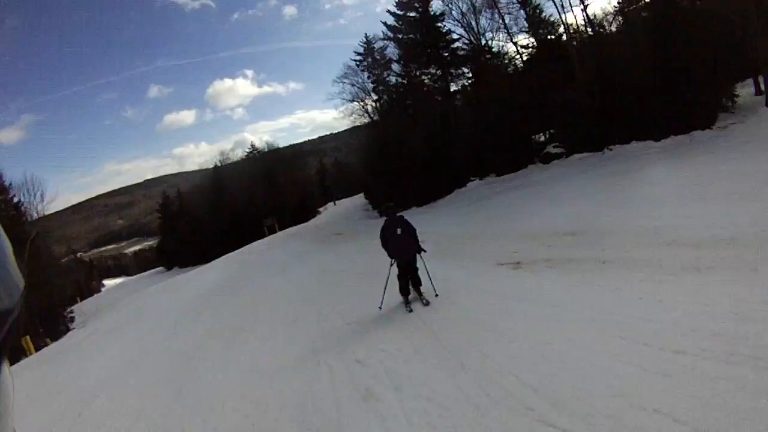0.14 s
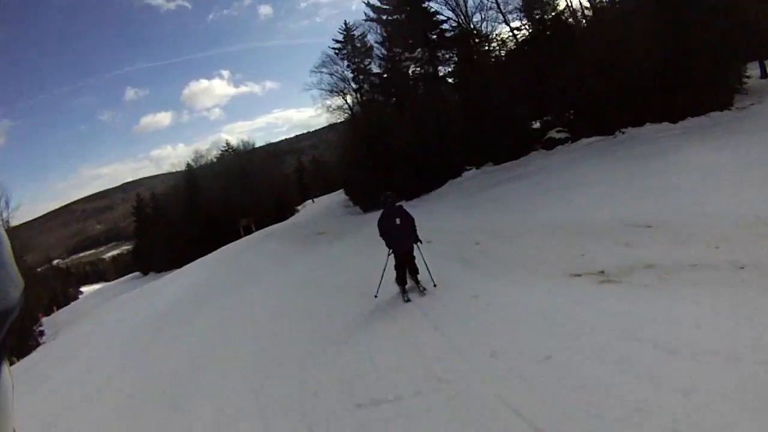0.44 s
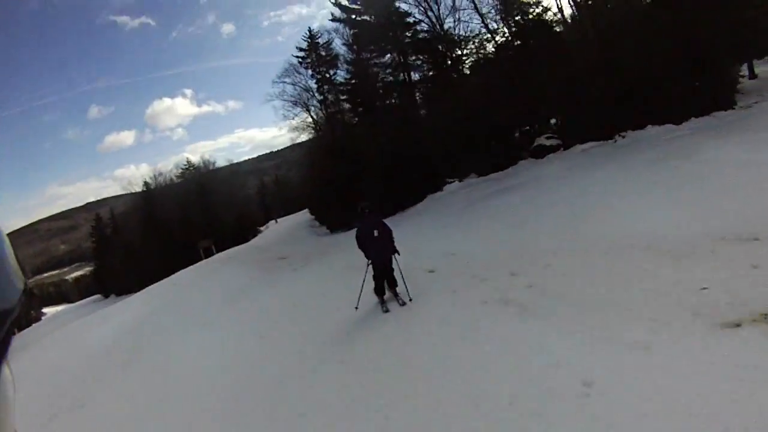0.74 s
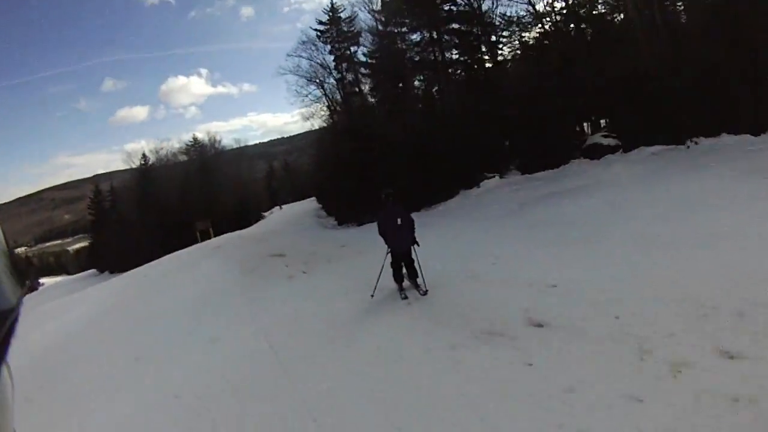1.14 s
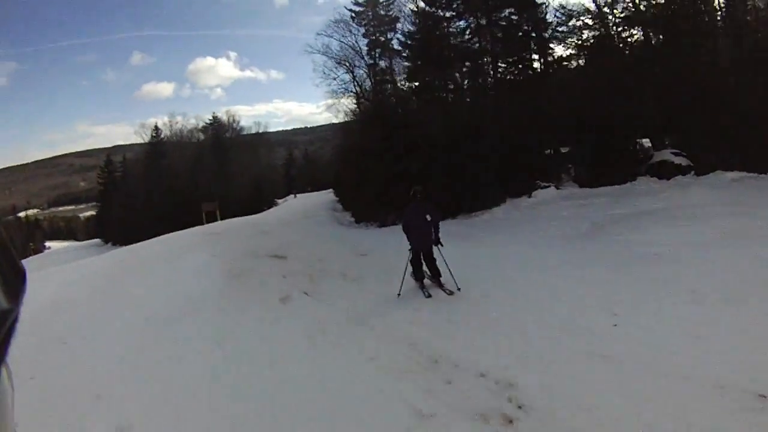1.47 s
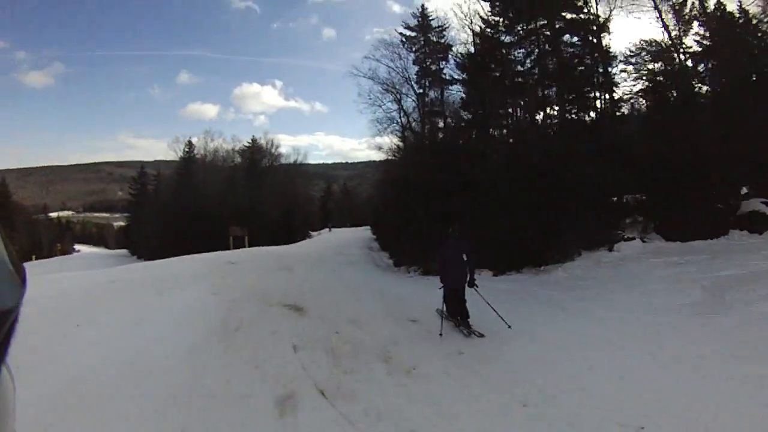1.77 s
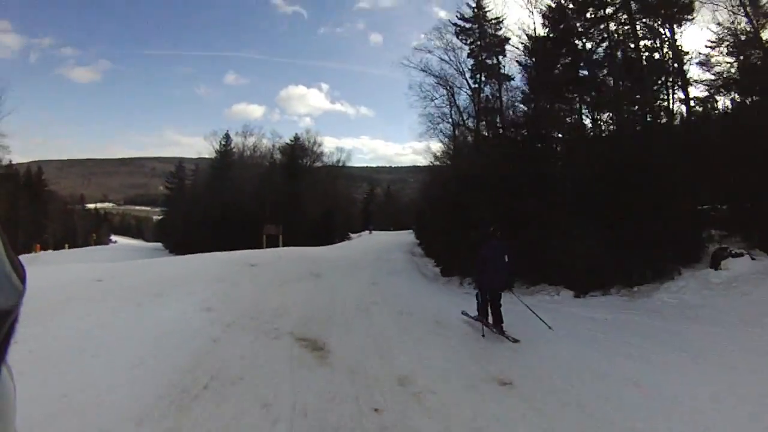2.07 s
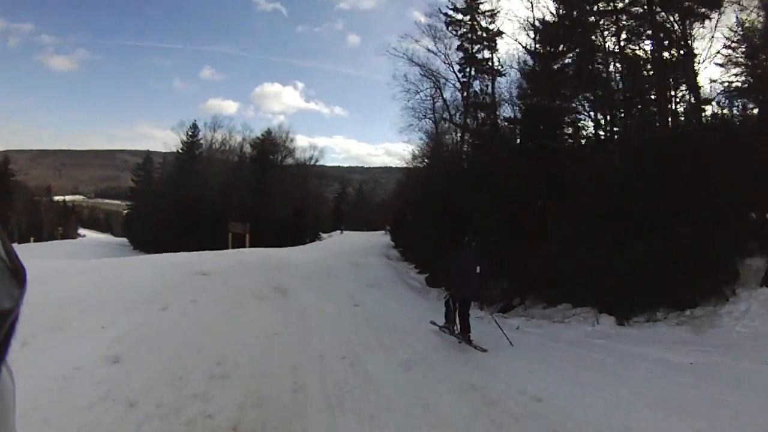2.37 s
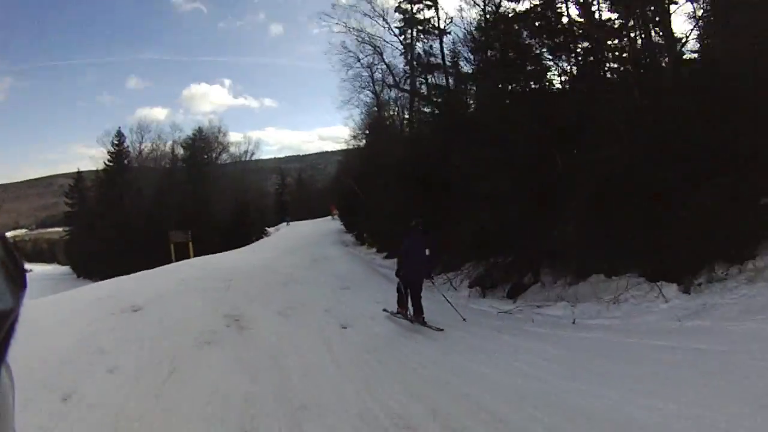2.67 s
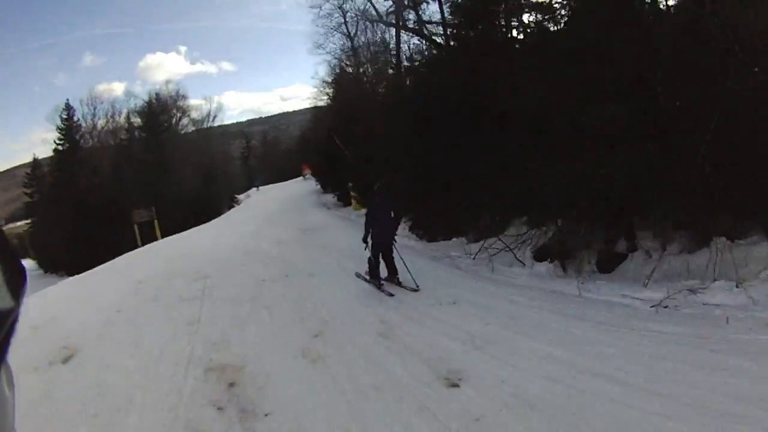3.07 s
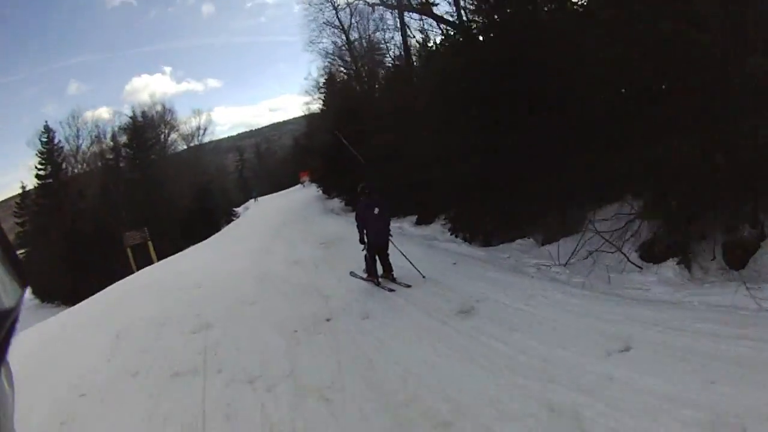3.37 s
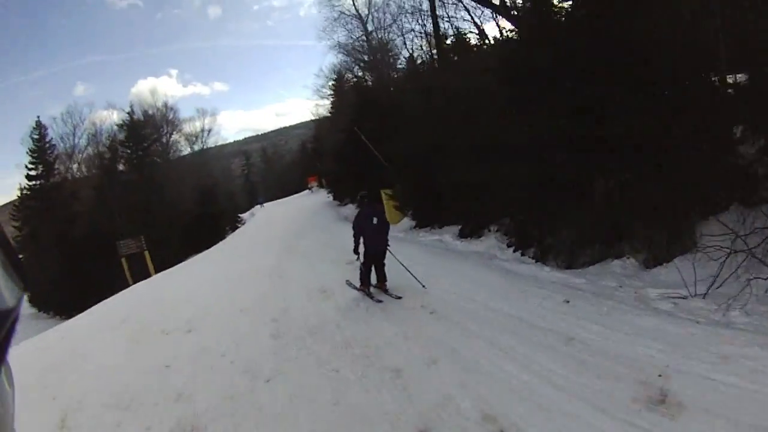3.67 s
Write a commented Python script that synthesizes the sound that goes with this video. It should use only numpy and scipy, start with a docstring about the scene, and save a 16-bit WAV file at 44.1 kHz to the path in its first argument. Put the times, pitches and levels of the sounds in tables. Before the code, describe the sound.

Lumpy wind noise with sharp pops covers skis scraping on snow, with a few brief knocks.

```python
"""A helmet camera glides down a snowy slope: lumpy, gusty wind opens over skis that hiss and crunch on snow.
Short housing knocks join in before half a second and longer ski crunches near one second; gusts pin the
capsule for milliseconds and the sound all but vanishes. The buffeting surges again after 2.6 s.
Wind is shaped noise with pressure pops, skis are shaped noise with sparse grains, and knocks and longer
crunches are noise bursts ringing the housing. One microphone feeds both channels."""
import sys
import numpy as np
from scipy import signal
from scipy.fft import rfft, irfft, next_fast_len
from scipy.io import wavfile
from scipy.ndimage import uniform_filter1d, map_coordinates

SR = 44100
rng = np.random.default_rng(int(sys.argv[2]) if len(sys.argv) > 2 else 0)


def master_out(mix):
    """Clip the mix to full scale and print it as 16-bit PCM to the path in sys.argv[1]."""
    frames = np.transpose(np.atleast_2d(mix))
    ceiling = np.clip(frames, -1, 1)
    pcm = np.round(ceiling * 32767).astype(np.int16)
    wavfile.write(sys.argv[1], SR, pcm)


N = 168021


def amp(db):
    """Decibels to linear gain."""
    return 10 ** (np.asarray(db) / 20)


def unit(x):
    """Scale to rms 1."""
    return x / np.sqrt(np.mean(x ** 2) + 1e-20)


def curves(rows):
    """One straight-line envelope, sample by sample, for each column after the time."""
    times, *columns = np.transpose(rows)
    return [np.interp(np.arange(N) / SR, times, column) for column in columns]


def wobble(rate):
    """A smooth random curve through `rate` random knots a second."""
    knots = rng.standard_normal(N // 50)
    return map_coordinates(knots, [np.arange(N) * rate / SR])


def filtered(x, response):
    """Multiply the spectrum by a response of frequency, zero-padded against wrap-around."""
    size = next_fast_len(N + SR // 2)
    spectrum = rfft(x, size) * response(np.fft.rfftfreq(size, 1 / SR))
    return irfft(spectrum, size)[..., :N]


def coloured(x, points):
    """Equalise with (Hz, dB) points joined on a log frequency axis."""
    f, db = np.transpose(points)
    return filtered(x, lambda hz: amp(np.interp(np.log(hz + 1), np.log(f + 1), db)))


def patchy(depth_db):
    """White noise whose gain varies in random patches of time and frequency."""
    spectrum = signal.stft(rng.standard_normal(N), nperseg=512)[2]
    field = uniform_filter1d(rng.standard_normal(spectrum.shape), size=6, axis=0)  # across frequency
    field = uniform_filter1d(field, size=8, axis=1)  # across time
    noise = signal.istft(spectrum * amp(depth_db * unit(field)), nperseg=512)[1]
    return unit(noise[:N])


LOW_CUT_HZ = 93.4


def low_cut(hz):
    """Second-order high-pass of the input stage."""
    s = 1j * hz / LOW_CUT_HZ
    return s * s / (s * s + np.sqrt(2) * s + 1)


def in_band(x, lo, hi):
    """Scale so that rms 1 is left between lo and hi Hz after the low cut."""
    heard = filtered(x, lambda hz: low_cut(hz) * (hz > lo) * (hz < hi))
    return x / np.std(heard)


# Gust envelope. Each row: time in seconds, buffeting level in dB, rush level in dB.
WIND_LEVELS = [(0.0, -36, -35.5), (0.07, -33, -35.5), (0.09, -28, -27), (0.14, -34.5, -37.5),
               (0.17, -26, -29.5), (0.19, -40, -42.5), (0.24, -34.5, -36.5), (0.29, -23.5, -29),
               (0.35, -23, -31), (0.42, -26.5, -35), (0.5, -27, -38), (0.58, -30.5, -41),
               (0.64, -33.5, -41.5), (0.69, -26, -37.5), (0.71, -33, -37.5), (0.73, -29.5, -27.5),
               (0.74, -31, -43.5), (0.78, -29.5, -33), (0.82, -25, -40), (0.84, -23.5, -34.5),
               (0.95, -33.5, -38), (1.0, -30.5, -36), (1.11, -36.5, -43.5), (1.15, -35.5, -55),
               (1.18, -31, -40), (1.36, -29, -37), (1.43, -36.5, -47.5), (1.47, -28.5, -38),
               (1.54, -37.5, -46), (1.6, -36.5, -43.5), (1.655, -45.5, -45), (1.68, -39, -48),
               (1.71, -45, -43), (1.75, -45.5, -44.5), (1.79, -29.5, -37.5), (1.84, -41.5, -38),
               (1.87, -44, -43.5), (1.91, -31, -36.5), (1.92, -56, -45), (1.94, -42, -46.5),
               (2.0, -33, -40), (2.29, -35, -43), (2.37, -46, -40), (2.49, -41.5, -46), (2.6, -31.5, -41.5),
               (2.62, -16.5, -31), (2.66, -30, -41), (2.67, -20, -32.5), (2.68, -34, -44.5),
               (2.75, -26, -37.5), (2.77, -39, -50.5), (2.79, -25.5, -37), (2.81, -33.5, -44),
               (2.85, -31.5, -45), (2.88, -33.5, -50), (2.89, -37.5, -50), (2.97, -32, -46),
               (3.01, -36, -41.5), (3.05, -27.5, -42), (3.08, -32, -46), (3.12, -30, -44),
               (3.14, -23.5, -40), (3.16, -30, -44), (3.26, -32.5, -37.5), (3.3, -29, -39),
               (3.36, -26.5, -40), (3.42, -28.5, -33), (3.48, -22, -35.5), (3.53, -23.5, -35.5),
               (3.55, -22, -38.5), (3.58, -33.5, -35), (3.61, -21.5, -39), (3.63, -28, -33.5),
               (3.7, -39.5, -39), (3.76, -26, -37), (3.81, -27.5, -40)]
# Slower wind envelope. Each row: time in seconds, rumble level in dB, level of the rush's upper edge in dB.
SLOW_LEVELS = [(0.0, -42, -51), (0.27, -42.5, -53), (0.4, -43, -53), (0.58, -52, -71), (0.88, -43.5, -49.5),
               (1.0, -42, -57.5), (1.3, -46, -54), (1.43, -51, -66), (1.51, -52, -59), (1.68, -52, -66),
               (1.88, -44.5, -54), (2.08, -42.5, -65.5), (2.46, -53, -65), (2.75, -41, -64),
               (3.08, -49, -79), (3.3, -44.5, -70), (3.59, -53, -57.5), (3.81, -34.5, -57.5)]
# Tone of the deep rumble. Each row: frequency in Hz, relative density in dB per Hz.
RUMBLE_TONE = [(15, -18), (30, 10), (60, 1.5), (100, -7), (160, -7), (300, -66)]
# Tone of the turbulent lumps. Each row: frequency in Hz, relative density in dB per Hz.
BUFFET_TONE = [(30, -37), (70, -1), (110, 0), (170, 2), (245, 4.5), (400, 0.5), (700, -10), (1500, -46),
               (3000, -94)]
# Tone of the rush above them. Each row: frequency in Hz, relative density in dB per Hz.
RUSH_TONE = [(100, -13), (300, -11.5), (600, 1.5), (1000, 0), (1500, -4), (1900, -13), (2300, -23),
             (3500, -29), (8000, -63)]
# Tone of the rush's upper edge. Each row: frequency in Hz, relative density in dB per Hz.
EDGE_TONE = [(1200, -8), (1800, 9.5), (2200, 2), (2800, -7), (4000, -15), (8000, -60)]
# The small pops' sizes spread evenly over this many dB; the share is of the power.
SMALL_POPS_PER_S, SMALL_POP_SPREAD_DB, SMALL_POP_SHARE = 400, 8, .12


def wind(buffet_swing_db, rush_swing_db):
    """Deep rumble, lumps of turbulence and rush, with small one-sided pops through all but the rumble."""
    buffet_db, rush_db = curves(WIND_LEVELS)
    rumble_db, edge_db = curves(SLOW_LEVELS)
    draw = rng.random((2, N))
    hits = draw[0] < SMALL_POPS_PER_S / SR
    small_pops = unit(hits * amp(SMALL_POP_SPREAD_DB * draw[1]))

    def eddy():
        """Fresh turbulent noise carrying the same small pops each time."""
        return np.sqrt(1 - SMALL_POP_SHARE) * patchy(depth_db=1) + np.sqrt(SMALL_POP_SHARE) * small_pops

    rumble = in_band(coloured(patchy(depth_db=1.5), RUMBLE_TONE), 25, 90)
    buffet = in_band(amp(buffet_swing_db) * coloured(eddy(), BUFFET_TONE), 100, 500)
    rush = in_band(amp(rush_swing_db) * coloured(eddy(), RUSH_TONE), 600, 1800)
    edge = in_band(amp(rush_swing_db) * coloured(eddy(), EDGE_TONE), 1900, 2700)
    low = amp(rumble_db) * rumble + amp(buffet_db) * buffet
    return low + amp(rush_db) * rush + amp(edge_db) * edge


# The sharpest pressure pops of wind on the port. Each row: time in seconds, peak in dB before the low cut.
POP_HITS = [(.0884, -15), (.0988, -15), (.1249, -19), (.1574, -18), (.1659, -15), (.2834, -16),
            (.7273, -18), (.741, -18), (.7552, -18), (.7923, -16), (1.3728, -20), (1.4807, -20),
            (1.5233, -24), (2.0707, -19), (2.5676, -22), (2.6151, -13), (2.6749, -16), (2.7143, -19),
            (2.7979, -19), (3.0661, -21), (3.0882, -22), (3.3304, -20), (3.5071, -14), (3.5493, -13),
            (3.6412, -21)]
POP_WIDTH_S = .00027  # standard deviation of the bell


def pops():
    """Each pop is one brief bell-shaped push of pressure."""
    t = np.arange(N) / SR
    return sum(amp(db) * np.exp(-.5 * ((t - s) / POP_WIDTH_S) ** 2) for s, db in POP_HITS)


# Ski envelope. Each row: time in seconds, scrape level in dB.
SKI_LEVELS = [(0, -56), (.08, -53.5), (.25, -55), (.30, -50.5), (.53, -58), (.70, -53), (.85, -56),
              (.95, -63), (1.01, -59.5), (1.10, -61.5), (1.30, -61), (1.44, -62.5), (1.53, -61),
              (1.58, -60), (1.61, -56.5), (1.64, -61), (1.658, -58), (1.685, -66), (1.705, -55.5),
              (1.735, -56.5), (1.77, -52), (1.90, -53), (2.0, -50), (2.19, -52.5), (2.32, -52), (2.48, -52),
              (2.53, -56.5), (2.60, -52.5), (2.70, -56.5), (2.79, -65.5), (2.84, -58), (2.96, -59.5),
              (3.05, -58.5), (3.18, -52.5), (3.27, -52.5), (3.5, -53.5), (3.66, -52.5), (3.81, -53)]
# Tone of the scrape through the housing. Each row: frequency in Hz, relative density in dB per Hz.
SCRAPE_TONE = [(800, -3.5), (2000, -48), (2500, -4.5), (3200, 0), (3700, 3), (3950, -2.5), (4560, 1),
               (5700, -2.5), (6250, -6.5), (6900, -1), (8000, -5.5), (8700, -11.5), (11300, -13),
               (12200, -21), (15400, -19.5)]
# Uneven snow under the skis. Each row: changes per second, swing in dB.
CRUNCH_SWINGS = [(25, -1), (60, 1), (200, 0.5)]
# Grain sizes reach above the smallest by this many dB on average; the share is of the power.
GRAINS_PER_S, GRAIN_SPREAD_DB, GRAIN_SHARE = 2500, 1.8, 0.25


def skis(swing_db):
    """Hiss plus single snow grains breaking, pulsing with the uneven surface."""
    level_db, = curves(SKI_LEVELS)
    draw = rng.random((3, N))
    hits = draw[0] < GRAINS_PER_S / SR
    polarity = np.sign(draw[1] - .5)
    grains = hits * polarity * amp(-GRAIN_SPREAD_DB * np.log(draw[2] + 1e-9))
    raw = np.sqrt(1 - GRAIN_SHARE) * patchy(depth_db=1.5) + np.sqrt(GRAIN_SHARE) * unit(grains)
    uneven_db = swing_db + sum(db * wobble(rate) for rate, db in CRUNCH_SWINGS)
    scrape = coloured(amp(uneven_db) * raw, SCRAPE_TONE)
    return amp(level_db) * in_band(scrape, 2800, 9000)


# Short knocks on the housing and longer crunches of the skis heard through it. Each row: start in seconds,
# burst length in seconds, then the peak in dB before the low cut for each resonance from low to high.
HOUSING_HITS = [(.3735, .002, -30, -43, -52, -51, -54, -51), (.7258, .0025, -21, -48, -34, -39, -38, -54),
                (.940, .004, -48, -56, -50, -56, -62, -72), (.970, .018, -45, -55, -52, -56, -55, -64),
                (1.019, .012, -40, -49, -44, -51, -57, -68), (1.520, .004, -33, -45, -58, -62, -64, -74),
                (1.596, .012, -39, -51, -50, -53, -56, -70), (2.0690, .0025, -28, -42, -38, -46, -38, -50),
                (2.285, .015, -46, -52, -46, -49, -53, -64), (2.548, .004, -44, -54, -49, -56, -60, -70),
                (2.6047, .003, -38, -45, -35, -48, -43, -60), (2.6095, .003, -36, -48, -41, -44, -52, -60),
                (2.7132, .0018, -34, -40, -48, -58, -47, -47), (2.7345, .003, -40, -39, -58, -62, -64, -72),
                (2.755, .004, -42, -51, -58, -64, -66, -74), (2.832, .008, -46, -56, -52, -54, -58, -70),
                (3.128, .012, -45, -55, -49, -52, -54, -64), (3.180, .003, -40, -46, -46, -51, -55, -64),
                (3.188, .008, -42, -52, -48, -50, -51, -61)]
# Resonances of the housing. Each row: centre in Hz, width in Hz.
CASE_MODES = [(1250, 900), (2500, 900), (3750, 900), (5300, 1300), (7300, 1700), (11000, 5500)]


def knocks_and_crunches():
    """A short or longer noise burst rings every resonance of the housing, each with its own strength."""
    out, t = np.zeros(N + SR), np.arange(SR // 20) / SR
    for start, length, *peaks_db in HOUSING_HITS:
        u = t / length
        burst = u * np.exp(-4 * u * u) * rng.standard_normal(len(t))
        for (hz, width_hz), db in zip(CASE_MODES, peaks_db):
            edges = [hz - width_hz / 2, hz + width_hz / 2]
            mode = signal.butter(3, edges, "band", fs=SR, output="sos")
            ring = signal.sosfilt(mode, burst)
            # peak estimated from the loudest millisecond
            peak = np.sqrt(2 * uniform_filter1d(ring ** 2, size=SR // 1000).max())
            out[round(start * SR):][:len(t)] += amp(db) * ring / peak
    return out[:N]


# Swings shared by the layers. Each row: changes per second, buffeting swing in dB, rush swing in dB,
# scrape swing in dB.
EDDY_SWINGS = [(40, .3, .4, .3), (80, .8, 1.3, .5), (150, 1.1, 1.7, .5)]


def scene():
    """Eddies shake buffeting, rush and scrape together; pops, knocks and longer crunches land on top."""
    swings = sum(np.outer(depths, wobble(rate)) for rate, *depths in EDDY_SWINGS)
    mono = wind(swings[0], swings[1]) + pops() + skis(swings[2]) + knocks_and_crunches()
    return np.array([mono, mono])


# Moments when a gust pins the capsule. Each row: start in seconds, length in seconds.
PINNED_SPANS = [(.4435, .0062), (.7558, .0032), (1.0700, .0078), (1.0850, .0015), (1.1348, .0072),
                (1.1485, .0035), (1.1858, .0012), (1.2655, .002), (1.9195, .0108), (2.0460, .003),
                (2.0722, .0033), (3.1850, .0025), (3.2232, .0063)]
LEAK_DB = -26  # capsule movement left while pinned
TOP_HZ = 15450


def record(dry):
    """While pinned the capsule hardly moves; the low cut lets the held pressure sag towards zero."""
    n = np.arange(N)
    held = sum(np.clip(np.minimum(n - s * SR, (s + length) * SR - n), 0, 1) for s, length in PINNED_SPANS)
    movement = np.diff(dry, prepend=0) * np.maximum(1 - held, amp(LEAK_DB))
    capsule = np.cumsum(movement, axis=1)
    capsule = capsule - np.linspace(0, 1, N) * capsule[:, -1:]  # straight drift removed, so it ends at zero
    return filtered(capsule, lambda hz: low_cut(hz) * (hz < TOP_HZ))


dry = scene()
out = record(dry)
master_out(out)
```